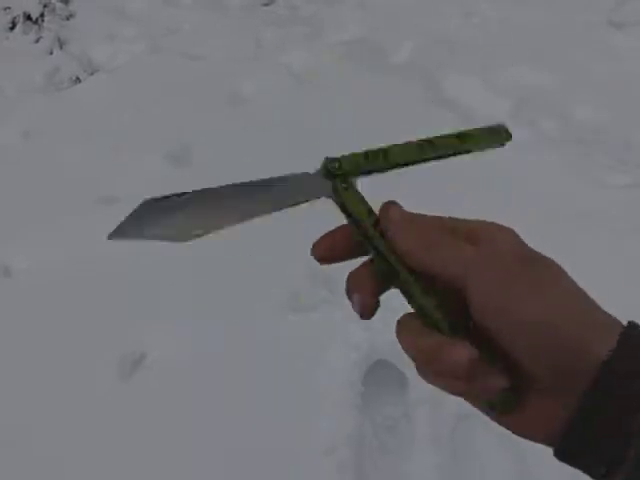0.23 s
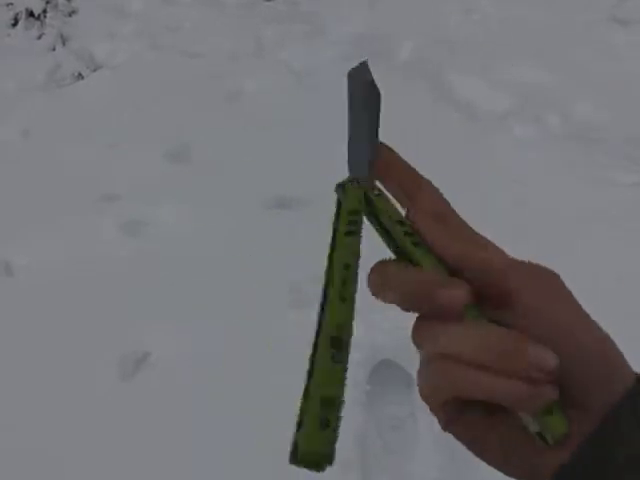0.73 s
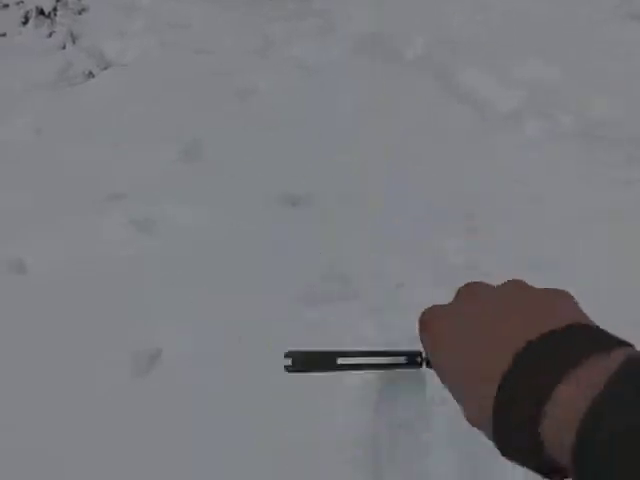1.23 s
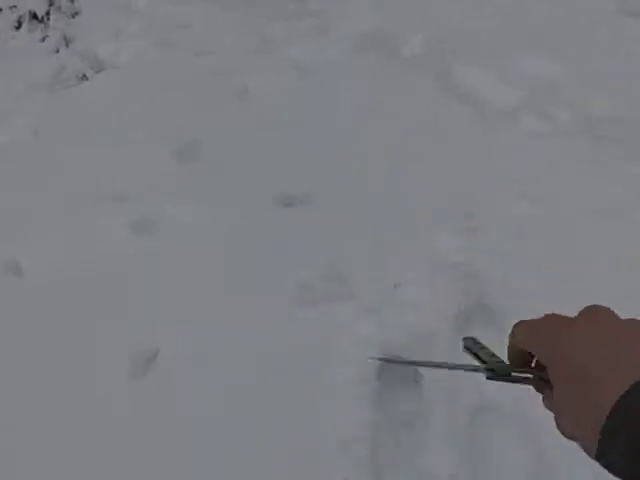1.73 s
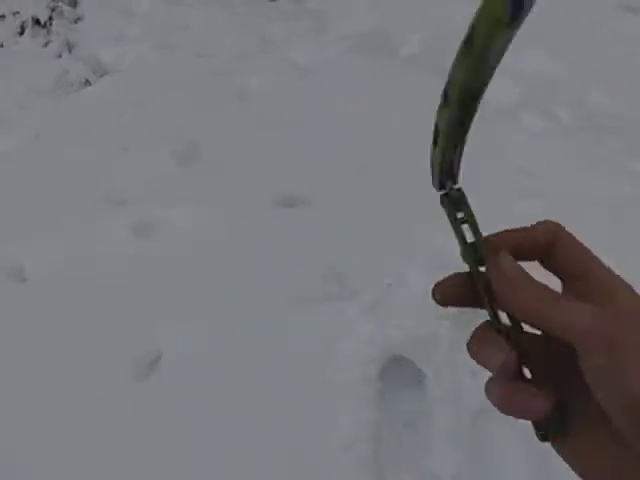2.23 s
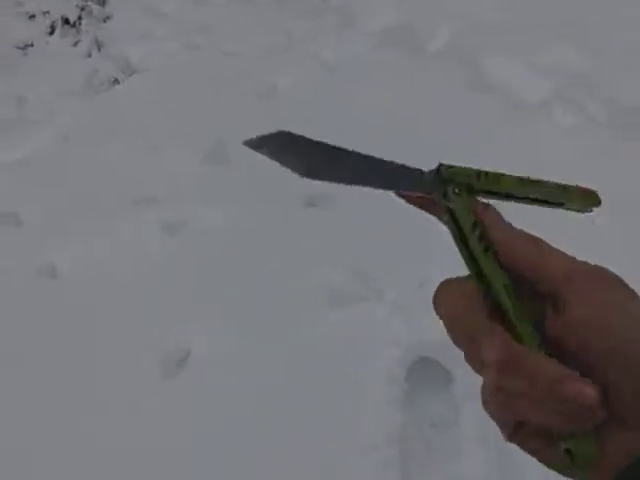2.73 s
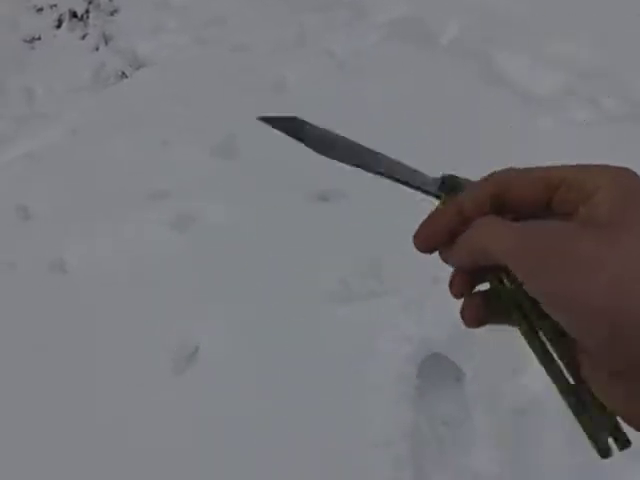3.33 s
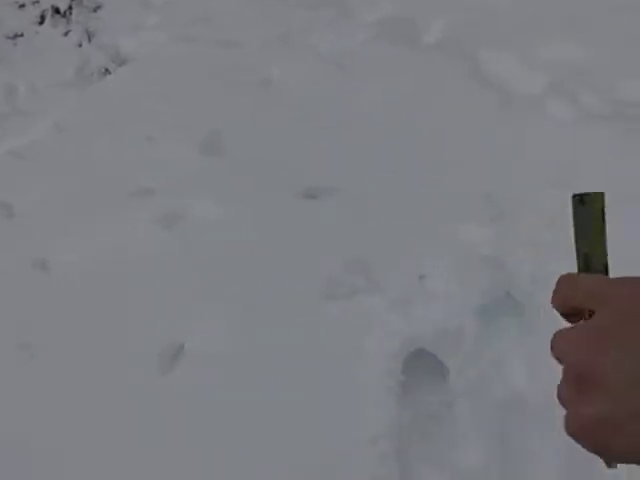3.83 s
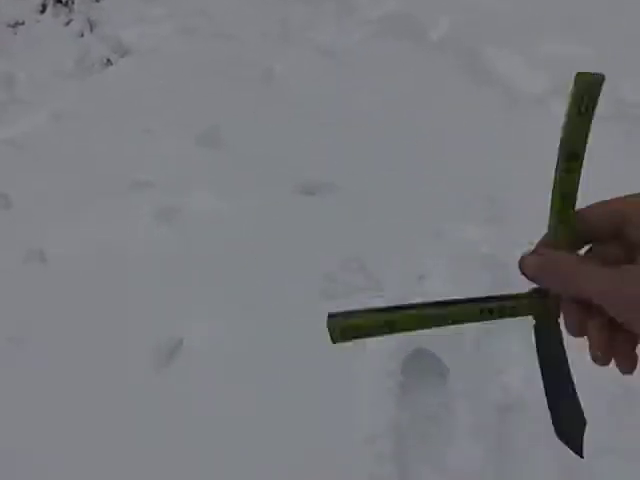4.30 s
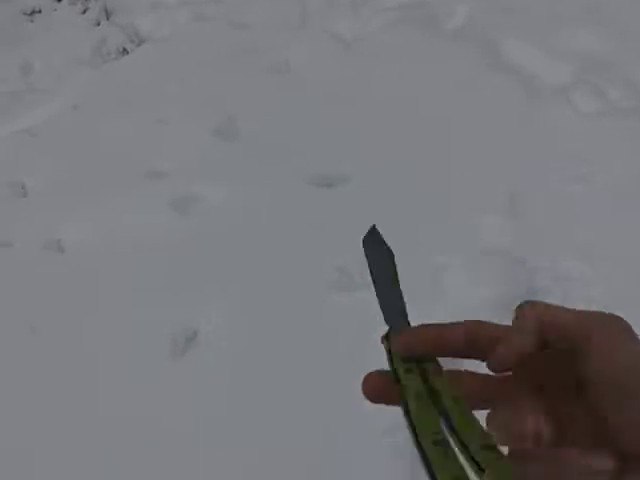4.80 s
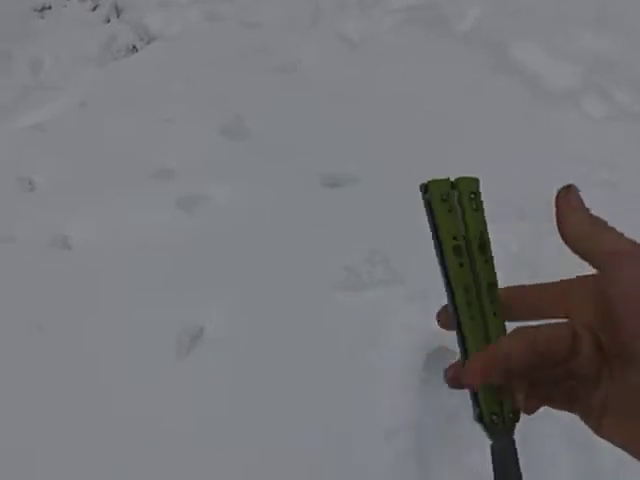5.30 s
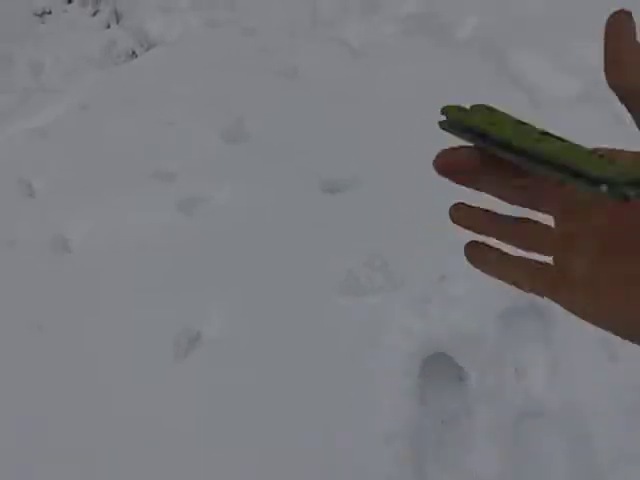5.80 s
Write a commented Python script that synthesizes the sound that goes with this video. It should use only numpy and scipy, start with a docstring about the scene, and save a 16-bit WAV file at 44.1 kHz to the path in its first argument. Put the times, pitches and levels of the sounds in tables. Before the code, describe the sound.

Irregular steel clicks, each damped within milliseconds, sit over quiet outdoor hiss and faint fluttering sleeve rustle. Tiny pivot ticks fill some gaps. Fingers knock the camera body softly around two seconds and again past five and a half. The busiest clatter comes around four and a half seconds; a short gritty scrape swells into the closing snap. Close, wide stereo, with the hiss dipping after the loudest hits.

```python
"""Butterfly knife flipped in snow

A butterfly knife is flipped and fanned close to a hand-held camera: short, hand-damped clusters
of steel modes with no echo, faint pivot ticks and one scrape, over filtered-noise air and sleeve rustle.
Wind puffs hit the ports at first; the grip on the camera shifts twice, as dull bumps that ring its case.
The stereo is widened and the camera's limiter ducks the hiss after the hardest clicks."""
import sys
import numpy as np
from scipy import signal
from scipy.fft import rfft, irfft
from scipy.io import wavfile
from scipy.ndimage import uniform_filter1d

SR = 44100
rng = np.random.default_rng(int(sys.argv[2]) if len(sys.argv) > 2 else 0)


def wrap_up_sound(samples):
    """Save the sound to the file named by the first command line argument, as 16-bit audio."""
    columns = np.atleast_2d(samples).T
    # keep every value between -1 and 1, then stretch to whole-number steps
    tamed = np.clip(columns, -1, 1)
    steps = np.round(tamed * 32767).astype(np.int16)
    wavfile.write(sys.argv[1], SR, steps)


N = 266937
TIME_S, FREQ_HZ = np.arange(N) / SR, np.fft.rfftfreq(N, 1 / SR)

# outdoor air spectrum: (frequency [Hz], relative density [dB per Hz])
AIR_COLOUR = [(25, -11), (55, -5.5), (90, -0.5), (125, 4), (320, 1.5), (500, -5.5), (750, -11),
              (1300, -10.5), (2100, -17), (3300, -24.5), (8000, -32), (14500, -22), (15450, -16),
              (15750, -80)]
# likeness of the air at the two ports: (frequency [Hz], correlation [-1..1])
AIR_LIKENESS = [(50, 0.85), (130, 0.93), (320, 0.9), (500, 0.65), (750, 0.12), (1400, 0.25), (2200, 0)]
AIR_DB = -49
PORT_LAG_S = .00006  # air and grip sounds reach the right port this much later

# sleeve and finger rustle, before near_db: (time [s], level [dB])
RUSTLE_LEVEL = [(0, -55), (.7, -58.5), (1.1, -53.5), (1.6, -56), (2.6, -57), (3.15, -61), (3.55, -56.5),
                (4.1, -62), (5.45, -59), (5.8, -67)]
# quick finger brushes along a handle, before near_db: (time [s], peak level [dB])
BRUSHES = [(1.12, -62), (1.27, -70), (1.92, -63), (2.97, -56.5), (4.33, -59.5), (5.14, -56.5), (5.41, -59),
           (5.58, -57)]
BRUSH_HALF_WIDTH_S = 0.043
# rustle spectrum: (frequency [Hz], relative level [dB])
CLOTH_COLOUR = [(500, -5), (2000, 6.5), (3500, -0.5), (5500, -0.5), (8000, -3.5), (10500, 0), (12500, 4.5),
                (15400, 3), (15750, -44)]

# wind puffs on the ports: (time [s], peak level [dB], half-width [s])
PUFFS = [(.05, -45, 0.031), (.205, -40.5, 0.018)]
# puff spectrum: (frequency [Hz], relative level [dB])
WIND_COLOUR = [(20, -14), (55, 1), (120, 2), (200, -21), (500, -32), (2000, -80)]

# loose pivots shifting: (time [s], level [dB], ring [Hz])
TICKS = [(.2385, -53.5, 5530), (0.8768, -51, 3260), (1.0795, -53.5, 3380), (1.099, -51.5, 4970),
         (1.165, -54, 5330), (1.2843, -50.5, 3240), (1.875, -48.5, 9400), (1.9271, -61, 8100),
         (2.035, -54.5, 8400), (2.786, -56, 7360), (3.054, -44, 6200), (5.156, -53.5, 5700),
         (5.406, -55, 5300), (5.445, -54, 3130), (5.4565, -56, 3400)]

# knife clicks: (time [s], level [dB], rebound delay [s], t60 [s], tilt [dB per octave],
#                side ring [dB], left minus right [dB], extra path to the right port [cm],
#                then three rings favoured by the contact, each as ring [Hz], lift [dB])
CLICKS = [(0.7629, -34.5, 0.0061, 0.0063, -12, -2.5, -13, -2, 3200, 7.3, 5050, 7.3, 7360, 8.1),
          (1.6811, -25, 0.0032, 0.006, -4, -3.5, -9.5, 6, 6060, 3.3, 9900, 8.9, 12000, 2.4),
          (1.723, -41.5, 0.0055, 0.0091, -4, 1, -13, 0.2, 2050, 15, 2870, 7.2, 6730, 7),
          (1.9788, -36.5, 0.0036, 0.007, 9, -20, 0, 8.5, 4250, 12, 9500, 3, 15000, 12),
          (2.3076, -33, 0.0, 0.0077, -5.5, -1.5, 12, -1.3, 8000, 7.6, 12800, 6.3, 14800, 14.6),
          (2.642, -29, 0.0, 0.0092, -0.5, -10, -11.5, -1.5, 4300, 7.3, 6530, 4.4, 8000, 4),
          (3.0329, -23, 0.0075, 0.0087, -4, -5.5, 11.5, -4, 5500, 7.1, 6940, 5.9, 8800, 7.9),
          (3.2701, -29.5, 0.0038, 0.017, -6.5, -6, 12, -2.5, 1122, 8.7, 2100, 10, 8120, 8.1),
          (3.7784, -20.5, 0.000021, 0.009, 0, -8, 1.5, 7, 3050, 10, 4550, 12.6, 5910, 7.5),
          (3.9, -36, 0.0036, 0.0054, -8, -2, 11, -5, 4840, 15, 7650, 8.6, 10800, 7),
          (4.3739, -25.5, 0.0046, 0.0075, -1, -15, 15, 8, 1234, 2.9, 3650, 3.7, 5990, 6.3),
          (4.4083, -18, 0.0, 0.0046, 0.5, -8, 9.5, 2.5, 3484, 10, 6900, 9.8, 9700, 13.5),
          (4.421, -24.5, 0.0032, 0.0091, -5, -3, 3, 8, 6950, 9, 9890, 7, 13110, 9),
          (4.4288, -27, 0.0061, 0.012, -6.5, -8, 0, 3, 4990, 7.2, 13000, 8, 14650, 8.5),
          (4.5222, -25, 0.0, 0.0073, -2, -5.5, -11.5, 7, 5460, 10.5, 6800, 10, 8700, 18),
          (4.562, -37, 0.0063, 0.0082, -6, 4, -11.5, 8, 5940, 8.5, 6900, 6.8, 9100, 5.9),
          (4.7497, -29.5, 0.012, 0.0063, -4.5, -7.5, -10.5, 5.5, 5400, 15, 6800, 6.7, 8660, 20.5),
          (5.09, -47, 0.0032, 0.0077, -4.5, 0, 11, 6.5, 3300, 3.7, 5770, 10, 7900, 2.9),
          (5.212, -27.5, 0.0, 0.0077, -3, -17, 4, 7, 5680, 4.8, 7240, 8.3, 9300, 8.6),
          (5.2315, -34.5, 0.005, 0.01, -8, -23, -10, -7, 5200, 2.9, 7100, 8, 9800, 3.1),
          (5.963, -44.5, 0, 0.0067, -10, -20, -17, 2, 3050, 3.7, 4320, 7.1, 6690, 6),
          (5.98, -31, 0, 0.0055, -2, -11, 6, 8, 5490, 3.8, 6820, 10, 9800, 5.3),
          (5.987, -29, 0.0, 0.0022, 0, -7, 10.5, 7, 5570, 5, 6930, 11, 10040, 10),
          (5.9914, -33, 0.014, 0.0063, -7, -7, -8, 4, 2170, 13, 6250, 6, 10600, 8.2),
          (5.9942, -38, 0, 0.007, -3, -8, 6, 6, 3300, 6, 5400, 8, 9900, 5),
          (5.9959, -16.5, 0, 0.0055, -0.5, -15, 7, 9, 6750, 11, 10300, 7, 12600, 10),
          (6.004, -29.5, 0.0077, 0.0086, -5, -4, 9, 9, 6000, 18, 9030, 6, 13200, 8.7)]
MIN_REBOUND_S, REBOUND_DB = .002, -13.5  # shorter delay: no rebound; level re first strike
# steel spectrum: (frequency [Hz], relative level [dB])
STEEL_COLOUR = [(60, -37), (250, 0), (1000, -7), (1700, 2.5), (2750, -9.5), (3400, -4.5), (4100, 0.5),
                (5600, 3.5), (7500, 2.5), (10000, 7.5), (12000, 10.5), (14900, 13.5), (15600, 14),
                (16600, -25)]
RING_DB, RING_T60_S = -10.5, 0.011  # tones at the favoured rings, re the cluster
SIDE_RING_HZ, SIDE_RING_T60_S = 2366, 0.022  # narrow ring, opposite in phase between left and right
CLICK_LIKENESS = 0.72  # correlation of a click at the two ports
SOUND_CM_PER_S = 34300

# bumps on the camera body: (time [s], level [dB], pitch [Hz], half-width [swings],
#                            slipping skin re bump [dB])
BUMPS = [(2.1682, -24, 194, 0.37, -33), (2.266, -43, 450, 0.43, -1), (2.2736, -22, 385, 0.44, -17),
         (2.3248, -32.5, 500, .5, -7), (2.41, -35, 525, 0.56, -3), (2.4192, -23.5, 434, 0.25, -21),
         (2.499, -24.5, 274, 0.27, -18.5), (5.5392, -21, 210, 0.27, -36), (5.5926, -19, 267, 0.31, -36),
         (5.679, -26.5, 141, 1.5, -29), (5.6898, -30, 257, 0.51, -21)]
# camera case rings, re bump: (frequency [Hz], level [dB], t60 [s])
CASE_RINGS = [(348, -13.5, 0.042), (531, -20, 0.019)]
FLESH_DB, FLESH_HALF_WIDTH_S = -9, 0.00055  # soft fingertip thud under every bump

# finger slide on the camera body, between two bumps
SLIDE_START_S, SLIDE_HOLD_S, SLIDE_RISE_S = 2.411, 0.076, 0.0043
SLIDE_DB, SLIDE_FADE_DB_PER_S = -49.5, 80
# slide spectrum: (frequency [Hz], relative level [dB])
SKIN_COLOUR = [(150, 5), (450, 9), (800, 2), (1100, 0), (1650, 4.5), (2500, -35), (3200, -4.5), (4200, -27),
               (15000, -55)]
# ring of the rub, sinking as the finger slows; level re the rub
SQUEAK_HZ, SQUEAK_SAG_HZ_PER_S, SQUEAK_WIDTH_HZ, SQUEAK_DB = 928, 2200, 230, -2.5

# handle scraping along the blade, ever harder until it shuts
SCRAPE_END_S, SCRAPE_DB = 5.997, -49
SCRAPE_GROWTH_DB_PER_S, SCRAPE_STOP_DB_PER_S = 117, 1100
# scrape spectrum: (frequency [Hz], relative level [dB])
SCRAPE_COLOUR = [(100, -12), (400, 16), (1500, 3), (2500, -2), (3200, 5.5), (4200, 0), (5600, 1),
                 (7500, -4), (10000, 0), (15000, 1), (16000, -25)]

# part of the other channel subtracted by the widening: (frequency [Hz], share [0..1])
CROSSFEED = [(100, .96), (8800, .96), (11000, .65), (14000, .42)]
CROSS_DELAY_S = 20 / SR
BAND_EDGE_HZ = 16700


def gain_of(db):
    """Decibels to amplitude."""
    return 10 ** (np.asarray(db) / 20)


def evened(x):
    """Scales to rms 1."""
    return x / np.sqrt(np.mean(x ** 2) + 1e-20)


def read(points, hz):
    """Interpolates a spectrum on a log-frequency axis."""
    f, value = np.transpose(points)
    return np.interp(np.log(hz + 1), np.log(f + 1), value)


def level(curve):
    """Gain over time from rows (time [s], level [dB])."""
    return gain_of(np.interp(TIME_S, *np.transpose(curve)))


def bell(x):
    """Gaussian of half-width 1 (standard deviation) and peak 1."""
    return np.exp(-.5 * x ** 2)


def coloured(x, points):
    """Filters x by a spectrum, at rms 1."""
    return evened(irfft(rfft(x) * gain_of(read(points, FREQ_HZ)), N))


def causal(db):
    """Minimum-phase response with this gain: rings only after the blow."""
    cepstrum = irfft(np.log(gain_of(db)))
    half = len(cepstrum) // 2
    cepstrum[1:half] *= 2
    cepstrum[half + 1:] = 0
    return np.exp(rfft(cepstrum))


def drift(rate_hz):
    """Random low-passed wander of rms 1."""
    lowpass = (FREQ_HZ > 0) * np.exp(-(FREQ_HZ / rate_hz) ** 2)
    return evened(irfft(rfft(rng.standard_normal(N)) * lowpass, N))


def correlated(a, b, likeness):
    """Signal that shares this correlation with a; the rest is b."""
    return likeness * a + np.sqrt(1 - likeness ** 2) * b


def lag_right(x, lag_s):
    """Delays the right port."""
    return np.array([x[0], irfft(rfft(x[1]) * np.exp(-2j * np.pi * FREQ_HZ * lag_s), N)])


def balanced(x, balance_db):
    """Sets left minus right level."""
    return x * gain_of([[balance_db / 2], [-balance_db / 2]])


def add(mix, time_s, sound):
    """Mixes a stereo sound in at time_s."""
    part = mix[:, round(time_s * SR):][:, :sound.shape[1]]
    part += sound[:, :part.shape[1]]


def air(waver_db=0.98, balance_db=0.5):
    """Outdoor hiss, gently wavering: noise most alike at the two ports in the bass."""
    a, b = rfft(rng.standard_normal((2, N)))
    likeness = np.clip(read(AIR_LIKENESS, FREQ_HZ), -1, 1)
    ports = irfft(np.array([a, correlated(a, b, likeness)]), N)
    ports = balanced(lag_right(ports, PORT_LAG_S), balance_db)
    return gain_of(AIR_DB + waver_db * drift(3.4)) * coloured(ports, AIR_COLOUR)


def rustle(snags_per_s=80, snag_db=-5, spread_db=2.5, flutter_db=1.56, near_db=-2):
    """Cloth and skin rub as the hand turns: fluttering noise with tiny decaying snags and quick brushes."""
    struck = rng.random(N) < snags_per_s / SR
    snags = struck * gain_of(spread_db * np.minimum(rng.exponential(1, N), 3))
    snags = signal.lfilter([1], [1, -np.exp(-1 / (0.0025 * SR))], snags)
    friction = np.sqrt(1 + (gain_of(snag_db) * evened(snags)) ** 2)
    friction = friction * gain_of(flutter_db * drift(19))
    brushes = sum(gain_of(db) * bell((TIME_S - time_s) / BRUSH_HALF_WIDTH_S) for time_s, db in BRUSHES)
    envelope = gain_of(near_db) * np.hypot(level(RUSTLE_LEVEL), brushes)
    return envelope * coloured(friction * rng.standard_normal((2, N)), CLOTH_COLOUR)


def wind():
    """Small puffs buffet the ports: low noise, independent at each port."""
    strength = sum(gain_of(db) * bell((TIME_S - time_s) / width_s) for time_s, db, width_s in PUFFS)
    return strength * coloured(rng.standard_normal((2, N)), WIND_COLOUR)


def click(t60_s, tilt_db, side_ring_db, pan_db, path_cm, *rings, ring_width_hz=170, size=2048):
    """Steel strikes steel: a dense cluster of modes that the hand damps within milliseconds."""
    t, hz = np.arange(size) / SR, np.fft.rfftfreq(size, 1 / SR)
    rings_hz, lifts_db = rings[::2], rings[1::2]
    attack = 1 - np.exp(-t / .0002)

    chatter = rfft(rng.standard_normal((2, size)) * attack * gain_of(-60 * t / t60_s))
    chatter /= np.sqrt(uniform_filter1d(abs(chatter) ** 2, size=26))  # a sharp blow feeds all bands alike
    path_delay = np.exp(-2j * np.pi * hz * path_cm / SOUND_CM_PER_S)
    chatter[1] = correlated(chatter[0], chatter[1], np.clip(CLICK_LIKENESS, 0, 1)) * path_delay

    # contact point: tilt about 8 kHz (low body untilted), plus groups of modes, wider the higher they lie
    octaves = read([(1700, 0), (3000, -1.4), (16000, 1)], hz)
    colour_db = read(STEEL_COLOUR, hz) + tilt_db * octaves
    for group_hz, lift_db in zip(rings_hz, lifts_db):
        width_hz = ring_width_hz * np.sqrt(group_hz / 1000)
        colour_db = colour_db + lift_db * bell((hz - group_hz) / width_hz)
    damping = np.clip(2 - 4 * t / t[-1], 0, 1)
    steel = evened(irfft(chatter * causal(colour_db)) * damping)

    # favoured rings sing with their own decay
    tones = 0
    for f in rings_hz:
        turns = f * t + rng.random((2, 1))
        tones = tones + gain_of(np.interp(f, hz, colour_db)) * np.sin(2 * np.pi * turns)
    tones = evened(tones * attack * gain_of(-60 * t / RING_T60_S))
    steel = evened(steel + gain_of(RING_DB) * tones)

    # narrow ring near 2.4 kHz, opposite in phase between left and right
    side_ring = evened(np.sin(2 * np.pi * SIDE_RING_HZ * t) * attack * gain_of(-60 * t / SIDE_RING_T60_S))
    sides = np.array([[.5], [-.5]])
    sound = steel + sides * gain_of(side_ring_db) * side_ring
    return balanced(sound, pan_db) * np.sqrt(.003 * SR / size)  # level counts over 3 ms


def pivots(t60_s=0.01, tilt_db=-2, side_ring_db=-15, lift_db=12):
    """Loose pivots shift: faint ticks with the same settings but for level and ring."""
    out = np.zeros((2, N))
    for time_s, db, ring_hz in TICKS:
        add(out, time_s, gain_of(db) * click(t60_s, tilt_db, side_ring_db, 0, 0, ring_hz, lift_db))
    return out


def knife():
    """Handles, blade and latch click; some bounce and strike the same spot again, softer."""
    out = np.zeros((2, N))
    for time_s, db, rebound_s, *contact in CLICKS:
        add(out, time_s, gain_of(db) * click(*contact))
        if rebound_s > MIN_REBOUND_S:
            add(out, time_s + rebound_s, gain_of(db + REBOUND_DB) * click(*contact))
    return out


def grip(slip_t60_s=0.014, balance_db=1.9, size=4096):
    """Fingers push on the camera body and let go: dull bumps that briefly ring its case, and one slide."""
    lead_s = .03  # room for the push before t = 0
    out, t = np.zeros((2, N)), np.arange(size) / SR - lead_s
    after = np.maximum(t, 0)
    case = sum(np.sin(2 * np.pi * hz * after) * gain_of(db - 60 * after / t60_s)
               for hz, db, t60_s in CASE_RINGS)
    thud = gain_of(FLESH_DB) * bell(t / FLESH_HALF_WIDTH_S)
    skin_band = signal.butter(3, [700, 2600], "band", fs=SR)
    for time_s, db, hz, swings, slip_db in BUMPS:
        push = -np.sin(2 * np.pi * hz * t) * bell(hz * t / swings)
        skin = evened(signal.lfilter(*skin_band, rng.standard_normal((2, size))))
        slip = gain_of(slip_db - 60 * after / slip_t60_s) * skin * (t > 0)
        add(out, time_s - lead_s, gain_of(db) * (push + thud - case + slip))
    return balanced(lag_right(out + slide(), PORT_LAG_S), balance_db)


def slide():
    """Skin drags over the case: an even rub with a sinking ring, which holds and then dies away."""
    since_s = np.maximum(TIME_S - SLIDE_START_S, 0)
    fade_db = SLIDE_FADE_DB_PER_S * np.maximum(since_s - SLIDE_HOLD_S, 0)
    envelope = np.minimum(since_s / SLIDE_RISE_S, 1) * gain_of(SLIDE_DB - fade_db)
    pitch_hz = SQUEAK_HZ - SQUEAK_SAG_HZ_PER_S * np.minimum(since_s, 2 * SLIDE_HOLD_S)
    phase = 2 * np.pi * np.cumsum(pitch_hz) / SR
    # narrow-band noise around the pitch
    squeak = evened(drift(SQUEAK_WIDTH_HZ) * np.cos(phase) + drift(SQUEAK_WIDTH_HZ) * np.sin(phase))
    rub = coloured(rng.standard_normal(N), SKIN_COLOUR)
    return envelope * (rub + gain_of(SQUEAK_DB) * squeak)


def scrape(grain_db=1.8, grain_hz=200):
    """Handle drags on the blade: gritty noise swells into the last rattle, stops as the handles meet."""
    until_s = SCRAPE_END_S - TIME_S
    drop_db = np.maximum(SCRAPE_GROWTH_DB_PER_S * until_s, -SCRAPE_STOP_DB_PER_S * until_s)
    grain = gain_of(grain_db * drift(grain_hz))
    return gain_of(SCRAPE_DB - drop_db) * grain * coloured(rng.standard_normal((2, N)), SCRAPE_COLOUR)


def scene():
    """Sum at the two microphone ports; snow returns no echo."""
    return air() + rustle() + wind() + pivots() + knife() + grip() + scrape()


def widen(x):
    """Stereo widening: each channel loses a delayed copy of the other, which combs mid and side in turn."""
    z = rfft(x)
    share = np.clip(read(CROSSFEED, FREQ_HZ), 0, .98)
    cross = share * np.exp(-2j * np.pi * FREQ_HZ * CROSS_DELAY_S)
    return irfft(z - cross * z[::-1], N)


def limit(x, threshold_db=-23.0, recovery_db_per_s=8, slope=1.0):
    """Limiter: clamps at once, lets go slowly, same gain on both channels."""
    power = uniform_filter1d((x ** 2).mean(0), size=132)
    power_db = 10 * np.log10(abs(power) + 1e-12)
    release_db = TIME_S * recovery_db_per_s
    held_db = np.maximum.accumulate(power_db + release_db) - release_db  # peak hold, falling steadily
    over_db = np.maximum(held_db - threshold_db, 0)
    return x / gain_of(slope * uniform_filter1d(over_db, size=40))


def record(dry):
    """Stereo widening, limiter, band limit."""
    lowpass = signal.firwin(511, BAND_EDGE_HZ, window=("kaiser", 9), fs=SR)
    return signal.oaconvolve(limit(widen(dry)), lowpass[None], "same")


dry = scene()
out = record(dry)
wrap_up_sound(out)
```